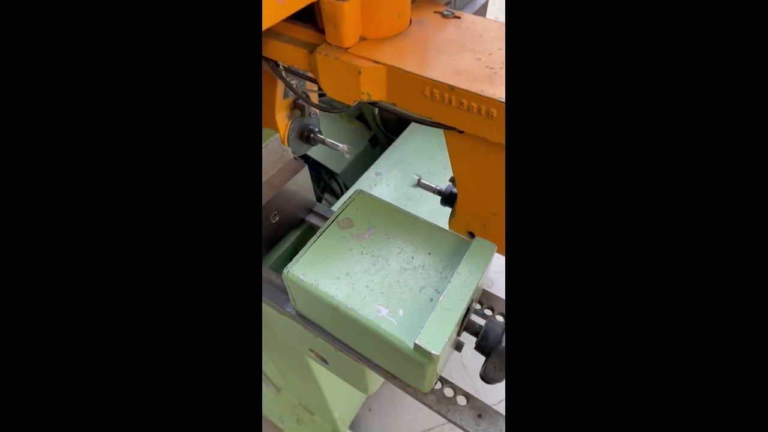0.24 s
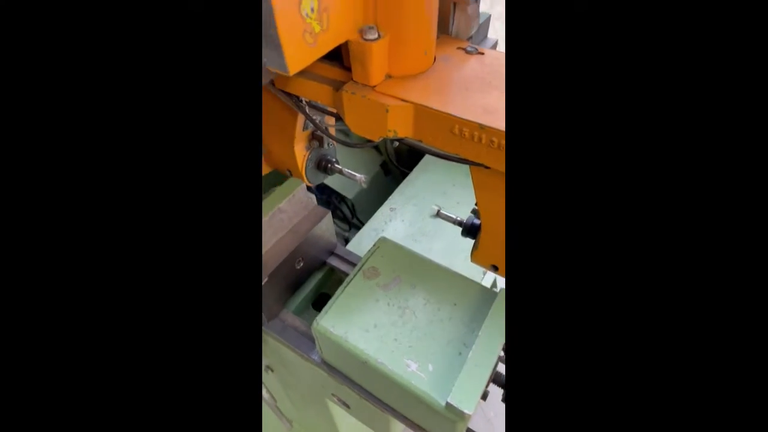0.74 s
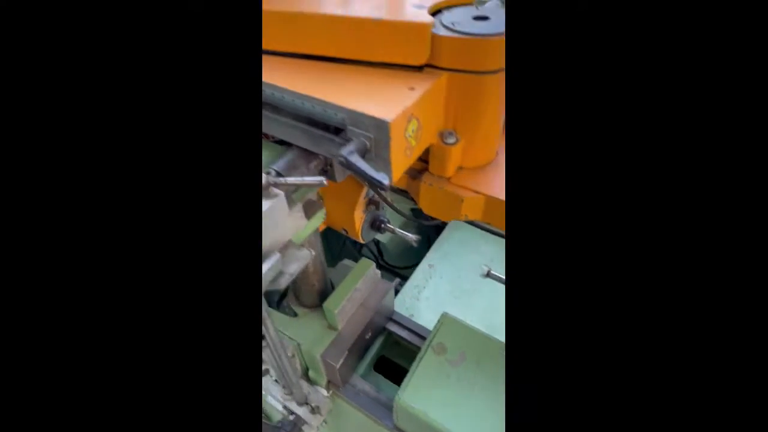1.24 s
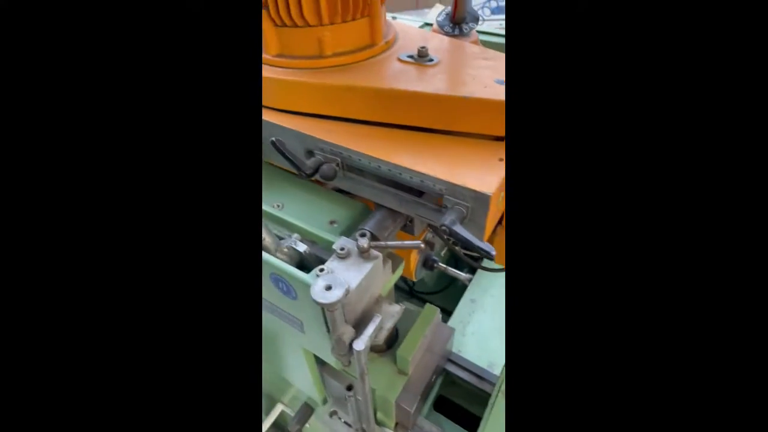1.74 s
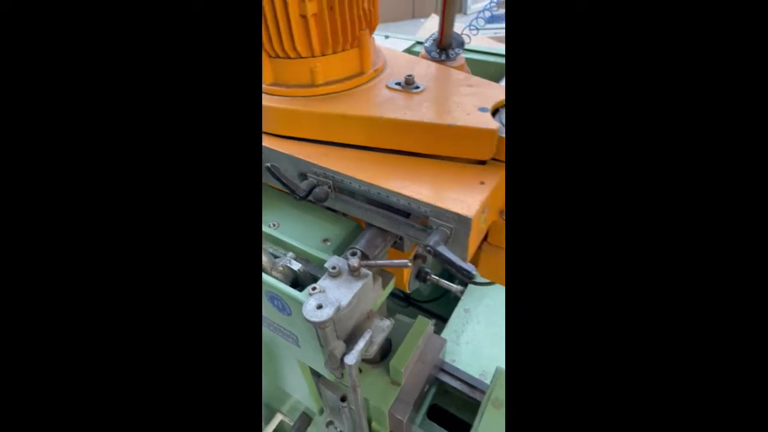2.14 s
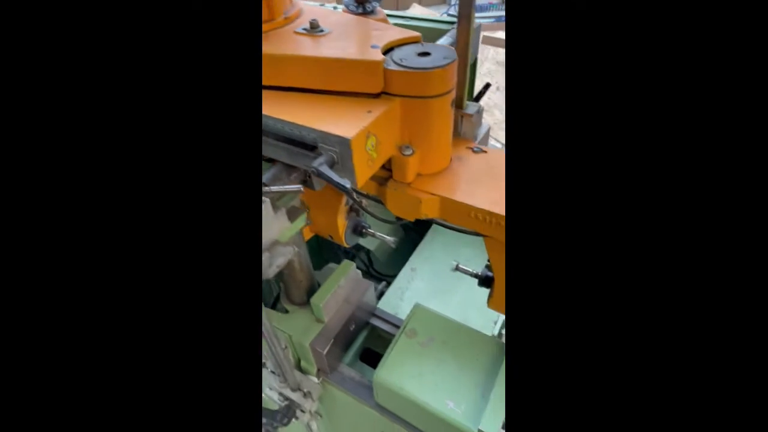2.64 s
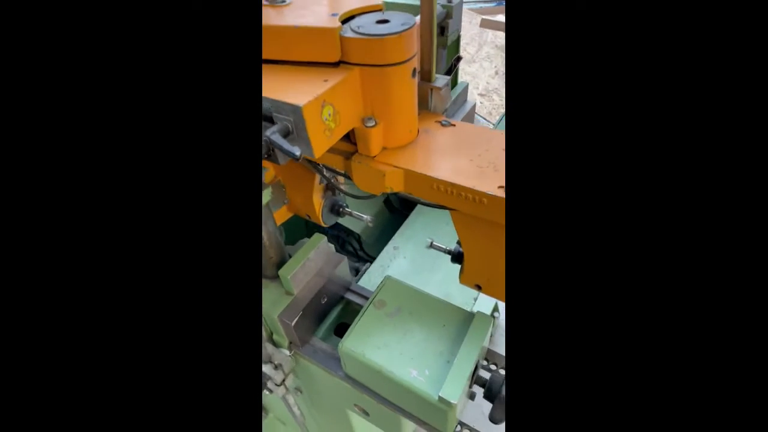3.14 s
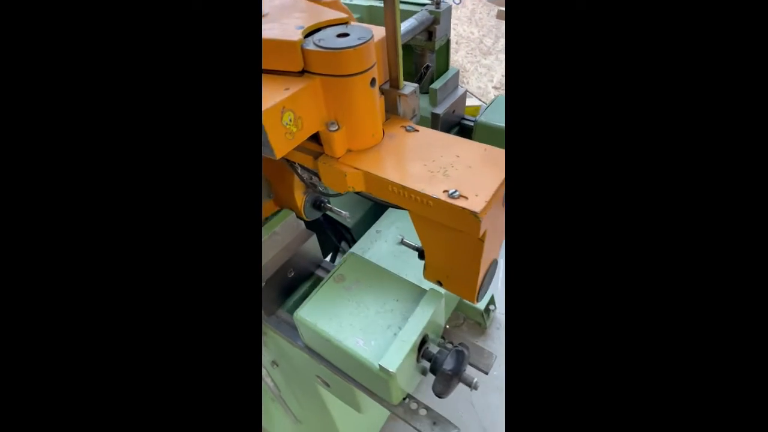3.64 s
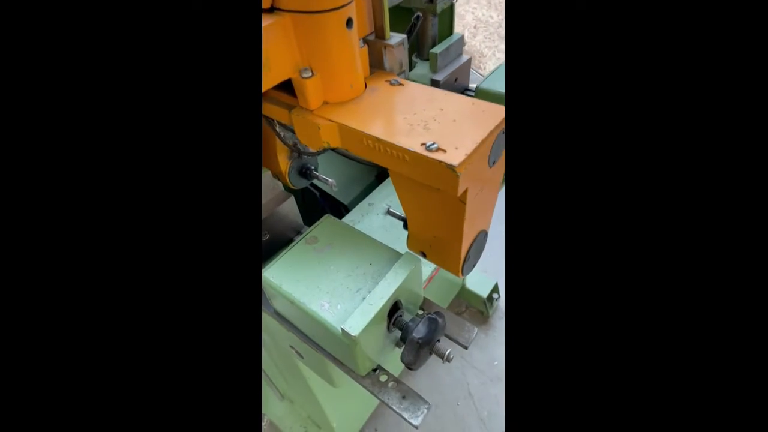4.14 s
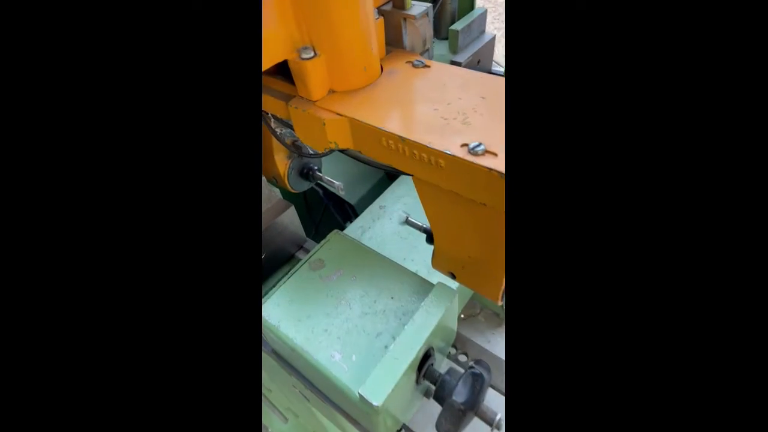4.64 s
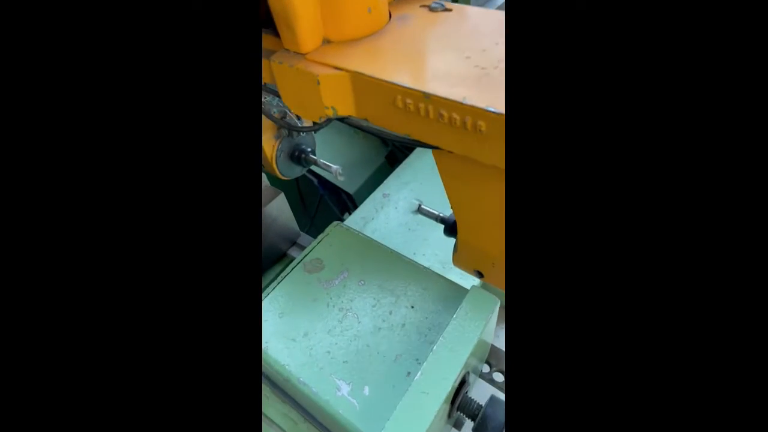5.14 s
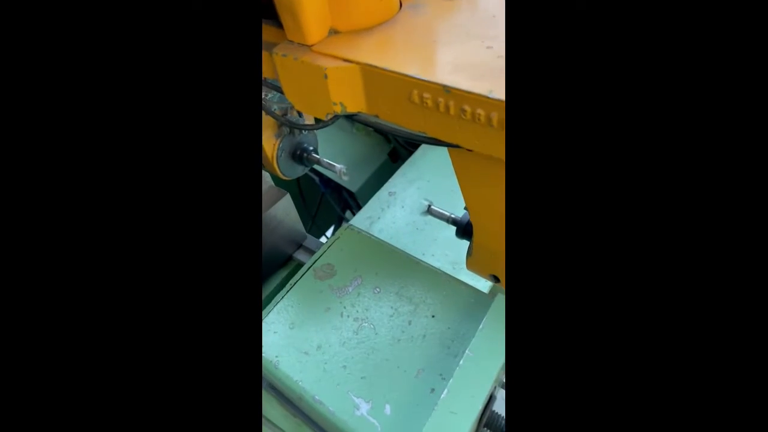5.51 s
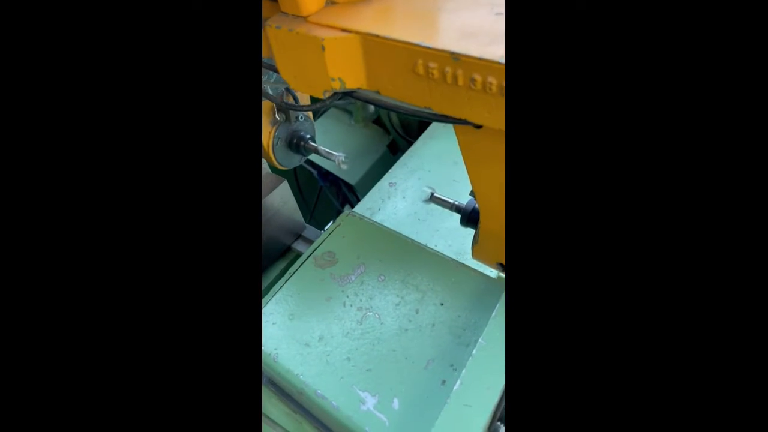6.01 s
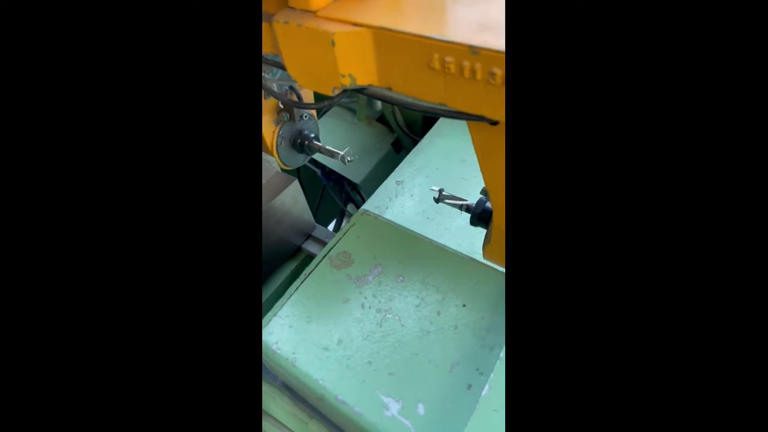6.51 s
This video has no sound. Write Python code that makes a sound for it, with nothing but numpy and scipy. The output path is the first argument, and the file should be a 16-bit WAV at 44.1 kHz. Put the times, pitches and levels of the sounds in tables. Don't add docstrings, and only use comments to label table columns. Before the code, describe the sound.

Steady high motor whine with bearing hiss in a workshop, then switch-off, a fast falling howl with rattling castings, and a buzzing electronic residue.

```python
import sys
import numpy as np
from scipy import signal
from scipy.fft import rfft, irfft
from scipy.io import wavfile

SR = 44100
rng = np.random.default_rng(int(sys.argv[2]) if len(sys.argv) > 2 else 0)


def inscribe(sig):
    pcm = np.round(np.clip(np.atleast_2d(sig).T, -1, 1) * 32767)
    wavfile.write(sys.argv[1], SR, pcm.astype(np.int16))


def ratio_of_db(decibels):
    return 10 ** (np.asarray(decibels, float) / 20)


N = 298557
TIME = np.arange(N) / SR
HZ = np.maximum(np.arange(N // 2 + 1) * SR / N, 1)

SHAFT_HZ, BRAKE_S, BRAKE_HZ_PER_S, EASING_HZ_PER_S2 = 160.2, 5.318, 153, 19.5
# [t/s, level/dB]
WHINE = [(0.0, -28), (0.47, -27.5), (0.84, -35.5), (1.03, -31.5), (1.24, -41.5), (1.4, -32.5),
         (1.52, -26.5), (1.77, -34.5), (2.05, -34.5), (2.15, -32), (2.4, -33), (2.45, -43.5), (2.68, -31.5),
         (2.96, -29), (3.17, -29.5), (3.4, -35.5), (3.65, -32.5), (3.77, -34), (3.86, -43), (3.92, -33.5),
         (4.47, -58), (4.57, -38), (5.31, -24.5)]
SHAFT_TONE = [(0.0, -39), (0.09, -44), (0.41, -37.5), (1.74, -37), (1.82, -42), (3.19, -35), (3.73, -38),
              (3.8, -48), (3.95, -39.5), (4.92, -39.5), (5.25, -47), (5.4, -46), (5.75, -48), (5.95, -38),
              (6.1, -46), (6.3, -54)]
LOWER_SIDE = -50, [(.15, -41, .3), (.58, -39, .15), (1.1, -44, .2), (1.75, -39, .2), (2.15, -40, .2),
              (2.8, -42, .3), (3.65, -45, .12), (4.2, -46, .1), (4.8, -41, .2), (5.2, -39, .2)]
UPPER_SIDE = -58, [(1.1, -39, .12), (2.55, -44, .2), (3.1, -47, .25), (4.25, -42, .25), (4.75, -45, .15),
              (5.25, -41, .2)]
SECOND_SIDE = -63, [(.3, -45, .2), (.85, -39, 0.23), (1.3, -39.5, 0.38), (2.15, -43, 0.24),
               (2.72, -42, 0.33), (3.4, -44.5, 0.35), (4.7, -47, 0.22), (5.2, -38, 0.23)]
LOWER_FALLING = -14, [(5.53, -4, .06)]
TWICE_SLOT = -40, [(1.05, -44, .3), (2.2, -45, .2), (3.5, -45, 0.39), (4.8, -41, 0.5)]
THRICE_SLOT = -50, [(.35, -45, 0.6), (.95, -44, 0.21), (2.15, -46, 0.36), (2.95, -44, .2), (3.9, -60, 0.15),
               (5.2, -50, 0.11)]
ORDER_18 = -67, [(.4, -44.5, 0.56), (2.5, -51, 0.24), (4.2, -45, 0.97)]
ORDER_21 = -56, [(.25, -50, .4), (1.55, -46, 0.28), (2.3, -46, .25), (2.9, -52, .3), (3.7, -51, 0.14),
            (4.5, -51, .15), (5.2, -44, .25)]
ORDER_22 = -55.5, [(.3, -42, .7), (2.0, -62, .5), (4.15, -48, 0.31), (5.1, -46, 0.52)]
ORDER_27 = -63, [(1.1, -48, 0.42), (2.5, -49, .3), (3.3, -45, .2), (4.0, -51, .2), (4.8, -47, 0.22),
            (5.2, -50, .2)]
BELT_SWELLS = [
    (-51.5, [(.57, -47, 0.36), (3.0, -50, 1), (5.2, -55, 0.64)]),
    (-53, [(.3, -47, 0.38), (2.2, -49.5, 0.75), (4.2, -49, 0.84), (5.3, -44.5, 0.66)]),
    (-55.5, [(1.6, -52.5, 0.68), (3.7, -53, 0.46)]),
    (-75, [(.6, -53.5, 1), (3.2, -53, 0.68), (4.8, -46, 1)]),
]
PUMP_SWELL = -64, [(1.9, -54, 0.97)]
TWICE_ORDERS = [47, 48, 49, 50, 51, 45, 46]
TWICE_DB = [-5, -3, -8, -13, -27, -17, -13]
THRICE_ORDERS = [72, 73, 71, 70, 69, 74, 75]
THRICE_DB = [-2, -2, -8, -10, -15, -10, -15]
WEAK_ORDERS = [11, 16, 17.9, 18.89, 19, 20, 22.79, 23.7, 24.3, 28, 28.09, 29.1, 30.11, 31.66, 33]
WEAK_DB = [-58, -58.5, -52.5, -65, -57, -51, -55, -52, -54, -61, -56, -54, -57, -60, -56]
BELT_ORDERS = [1.2, 1.8, 3.6, 6, 1.7, 2, 3, 4.5, 5, 5.11]
BELT_FAINT_DB = [-55.5, -59, -58, -55.5, -57.5, -59.5]
FALLING_DB = [-28, -29, -36, -41.5]
GROUPS_FALLING_DB = [-34, -40]
FALLING_POWER, SHAFT_POWER, GROUP_POWER, BELT_LAP_POWER = 0.93, 1.8, 2.2, .35
# [f/Hz, width/Hz, level/dB]
HOUSING = [(937, 77, 5), (1330, 58, -11), (1760, 90, -1.5), (1980, 68, -2), (2200, 180, -2),
           (2566, 70, 2.5), (2755, 78, 5.5), (2980, 120, 4), (3130, 130, 1.5), (3310, 120, -1),
           (3670, 140, 5.5), (3880, 98, 6), (5470, 930, 0), (6170, 620, 2), (9000, 1400, 5)]
BETWEEN_PEAKS_DB, HANDOVER_S = -15, 0.034
SKIRT_DB, SKIRT_HZ, SKIRT_LOST = -29, 150, .6
LAP_ORDERS = [1.8, 2.1, 2.7, 3.6, 4.5, 5.4, 6]
LAP_DB = [-37.5, -42, -43.5, -54, -54, -51, -58]
FRAME_HZ, FRAME_WIDTH_HZ = 268, 75
# [f/Hz, width/Hz, level/dB]
CASTINGS = [
    (184, 4.7, -4),
    (224, 6.5, -3),
    (264.5, 17, -0.5),
    (935, 30, -4),
    (2106, 91, -2),
]
SHAKE_IDLE_DB, SHAKE_TOP_DB, SHAKE_RISE_S, SHAKE_LOSS_DB_PER_S = -54.5, -39, 0.16, 11.5
# [f/Hz, level/dB]
DRIVE = [(204.3, -54.5), (619, -54), (705.2, -46), (409.5, -55), (829, -48.5), (11800, -52), (11827, -57),
         (3488, -57), (5787, -56), (5850, -57), (12026, -56), (12347, -60), (12762, -54), (12826, -55),
         (14105, -50), (14553, -54), (14649, -56), (14600, -55)]
DRIVE_ON_S, DRIVE_RISE_S = 5.5, 0.019
# [f/Hz, level/dB]
LATE = [(2030, -51), (1846, -62), (1599, -57)]
LATE_S, LATE_RISE_S = 6.42, 0.15
# [steps from the carrier, level/dB]
CARRIER = [(-4, -48), (-3, -47), (-2, -52), (-1, -48), (0, -43), (1, -54), (2, -55)]
CARRIER_HZ, THROB_HZ, CARRIER_DB = 11676, 32, -1.5
# [f/Hz, level/dB per Hz]
FIZZ = [(1500, -24), (2000, -6), (3400, 6), (4300, -38), (5200, -2), (5850, 8), (6600, -6), (8300, 0),
        (8900, -17)]
FIZZ_DB = -45.5
# [t/s, level/dB]
HUM = [(0, -50.5), (4.9, -49), (5.3, -45.5), (5.44, -48), (5.5, -36.5), (5.62, -36.5), (5.68, -43),
       (5.75, -40), (5.82, -41), (5.86, -53), (5.93, -45.5), (6.17, -40), (6.24, -56), (6.5, -51),
       (6.6, -70)]
HUM_HZ, HUM_DB = 240.6, 0
PUMP_HZ, PUMP_DB = 408.8, 3
# [t/s, f/Hz, width/Hz,
# length/s, level/dB]
BURSTS = [(6.01, 3050, 350, .08, -41), (6.3, 11650, 350, .6, -47), (1.8, 1750, 220, .7, -52),
          (5.452, 790, 250, 0.048, -39), (5.42, 50, 25, 0.082, -53), (5.61, 2110, 50, .02, -36),
          (5.655, 2130, 50, .015, -39), (5.69, 2090, 50, .015, -38), (5.74, 2110, 50, .025, -41),
          (6.07, 2800, 150, .03, -43), (5.935, 1950, 50, .03, -44), (5.923, 3680, 80, .04, -42),
          (6.37, 950, 60, 0.023, -44), (6.366, 470, 60, 0.019, -47), (6.462, 248, 70, 0.025, -48),
          (6.25, 55, 25, .15, -58), (6.604, 69.9, 40, .04, -54)]
# [f/Hz, level/dB per Hz]
RUMBLE = [(20, -35), (45, -10), (90, -3), (140, -0.5), (220, -22)]
ROAR = [(120, -10), (200, -0.5), (300, -5.5), (400, 1.5), (600, 1.5), (740, 9.5), (860, 0.5), (1100, 4.5),
        (1350, -1), (1750, 3.5), (2000, 1), (2400, -3), (3000, -18)]
WHIRR = [(2000, -12), (2500, -5.5), (2950, 1.5), (3300, 2), (3750, 4), (4300, 2.5), (4700, -2.5),
         (5100, -3)]
HISS = [(4200, -12), (4800, 5.5), (5600, 4.5), (6500, 2.5), (7200, -7), (8000, 8), (8800, -14)]
AIR = [(8000, -2), (8800, 3.5), (9500, 1.5), (10600, 2), (11600, 5.5), (12300, 1.5), (13000, 2.5),
       (14300, 3.5), (15700, 6), (16100, -21)]
# [level at speed/dB, share of nearness, loss at standstill/dB]
NOISES = [
    (-48.5, 0.45, 3),
    (-42, 3.1, 7.5),
    (-40, 1.34, 7),
    (-40, 2.03, 2),
]
# [t/s, level/dB]
NEAR = [(0, 1.5), (.3, 1), (1.0, 1.5), (1.45, 1), (1.79, 0.5), (2.04, 0), (2.55, 1), (3.5, 0.5), (4.2, 0),
        (5.3, 2), (5.51, 2.5), (5.7, 1.5), (6.2, -0.5), (6.77, 0.5)]
# [t/s, level/dB, dying time/s]
GRIPS = [
    (0.0, -41, .15),
    (.42, -52, .2),
    (1.0, -54, .25),
    (1.75, -56, .12),
    (3.73, -46, .22),
    (5.38, -53, .4),
    (4.55, -54, .4),
    (5.9, -58, .3),
    (6.58, -54, .06),
]
GRIP_QUIET_DB, GRIP_RISE_S = -62.5, 0.019
OFF_S, SAG_DB, SAG_S, TOP_LOST_DB, TOP_HZ = 5.375, -3, .25, -5, 14300
SHOP_T60_S, SHOP_DB = .3, -13
# [f/Hz, lag/rad]
LIKENESS = [(100, .999), (300, 0.99), (800, 0.87), (1300, 0.84), (1900, 0.93), (2600, 0.76), (3600, 0.06),
            (4500, 0.028), (5500, 0.57), (9000, 1), (16000, 0.82)]
LAG = [(50, 0), (500, -.4), (1400, -.1), (2000, .1), (2900, 1.1), (3700, .4), (4900, -.5), (5350, .3),
       (7600, np.pi), (11000, 2 * np.pi), (14250, 3 * np.pi), (16000, 11)]
# [low f/Hz, high f/Hz]
SUM_NULLS = [(6950, 8300), (13850, 14700)]
DIFFERENCE_NULL = (10400, 11450)
CUTOFF_HZ = 16050


def spindle():
    share = speed()
    turn = 2 * np.pi * np.cumsum(share * SHAFT_HZ) / SR
    grid = np.arange(0, 12500, 5)
    housing = ratio_of_db(BETWEEN_PEAKS_DB)
    for hz, width, db in HOUSING:
        housing = housing + ratio_of_db(db) / (1 + (2 * (grid - hz) / width) ** 4)
    braked = np.clip((TIME - BRAKE_S) / HANDOVER_S, 0, 1)
    start = int(BRAKE_S * SR)

    def level(k, steady, falling_db, power):
        gain = (1 - braked) * steady
        slowing = share[start:]
        lit = np.interp(k * SHAFT_HZ * slowing, grid, housing)
        gain[start:] += braked[start:] * ratio_of_db(falling_db) * slowing ** power * lit
        return gain

    def order(k, gain, fade_db, unlike=1.5):
        return line(k * turn, k * SHAFT_HZ, gain, fade_db, unlike)

    whine_db, shaft_db = in_time(WHINE) + in_time(SHAFT_TONE)
    steady = swells(*LOWER_SIDE), ratio_of_db(whine_db), swells(*UPPER_SIDE), swells(*SECOND_SIDE)
    slots = (23, 24, 25, 26)
    gains = [level(k, gain, db, FALLING_POWER) for k, gain, db in zip(slots, steady, FALLING_DB)]
    gains[0] *= 1 - braked + braked * swells(*LOWER_FALLING)
    out = order(1, ratio_of_db(shaft_db) * share ** SHAFT_POWER, 0, unlike=.8)
    out += sum(order(k, gain, 0, unlike=.8) for k, gain in zip(slots, gains))
    out += skirt(turn, gains[1] * (1 - SKIRT_LOST * braked))

    groups = (TWICE_ORDERS, TWICE_DB, TWICE_SLOT), (THRICE_ORDERS, THRICE_DB, THRICE_SLOT)
    for (orders, steps, swell), falling_db in zip(groups, GROUPS_FALLING_DB):
        gain = swells(*swell)
        for k, db in zip(orders, steps):
            out += order(k, level(k, gain, falling_db, GROUP_POWER) * ratio_of_db(db), 3.5)

    force = share ** 2
    out += sum(order(k, force * ratio_of_db(db), 2.5) for k, db in zip(WEAK_ORDERS, WEAK_DB))
    for k, swell in ((18, ORDER_18), (21, ORDER_21), (22, ORDER_22), (27, ORDER_27)):
        out += order(k, force * swells(*swell), 1.2)

    belts = [swells(*belt) for belt in BELT_SWELLS] + list(ratio_of_db(np.array(BELT_FAINT_DB)))
    belts[0] *= force ** (BELT_LAP_POWER - 4) * (share > .36)
    out += sum(order(k, force ** 4.0 * gain, .7) for k, gain in zip(BELT_ORDERS, belts))
    return out, turn


def speed():
    after = np.maximum(TIME - BRAKE_S, 0)
    lost_hz = BRAKE_HZ_PER_S * after - EASING_HZ_PER_S2 * after ** 2
    return np.maximum(1 - lost_hz / SHAFT_HZ, .005)


def skirt(turn, gain):
    play = signal.lfilter(*signal.butter(1, SKIRT_HZ, fs=SR), rng.standard_normal((2, N)))
    play = play[0] + 0.81 * play[1] * [[1], [-1]]
    return gain * ratio_of_db(SKIRT_DB) * play / play.std() * np.sin(24 * turn)


def castings(turn):
    knocks = np.diff(np.floor(turn / (2 * np.pi)), prepend=0) * ratio_of_db(1.5 * rng.standard_normal(N))
    knocks += 1.2 * np.diff(np.floor(0.27 * turn / (2 * np.pi)), prepend=0)
    knocks = (knocks * 5 + .4 * rng.standard_normal(N)) * shake()
    out = np.zeros(N)
    for hz, width, db in CASTINGS:
        r = np.exp(-np.pi * width / SR)
        ring = signal.lfilter([1, 0, -1], [1, -2 * r * np.cos(2 * np.pi * hz / SR), r * r], knocks)
        out += ratio_of_db(db) * np.sqrt(1 - r * r) * ring
    return out


def shake():
    after = TIME - BRAKE_S
    loss_db = SHAKE_LOSS_DB_PER_S * np.maximum(after - SHAKE_RISE_S, 0)
    braked = np.clip(after / SHAKE_RISE_S, 0, 1) ** 2 * ratio_of_db(SHAKE_TOP_DB - loss_db)
    return braked + ratio_of_db(SHAKE_IDLE_DB) * (after < SHAKE_RISE_S)


def frame(turn):
    hz = speed() * SHAFT_HZ
    out = np.zeros(N)
    for k, db in zip(LAP_ORDERS, LAP_DB):
        resonance = 1 / (1 + (2 * (k * hz - FRAME_HZ) / FRAME_WIDTH_HZ) ** 4)
        out += ratio_of_db(db + 3) * np.sin(k * turn) * resonance
    return np.clip((TIME - BRAKE_S) / SHAKE_RISE_S, 0, 1) * out


def bursts():
    out = np.zeros(N)
    for s, hz, width, length, db in BURSTS:
        burst = rng.standard_normal(N) * np.exp(-((TIME - s) / length) ** 2)
        band = [max(hz - width / 2, 10), hz + width / 2]
        sos = signal.butter(1, band, "band", fs=SR, output="sos")
        out += ratio_of_db(db) * np.sqrt(SR / 2 / width) * signal.sosfilt(sos, burst + 1e-18)
    return out


def drive():
    on = np.clip((TIME - DRIVE_ON_S) / DRIVE_RISE_S, 0, 1)
    out = line(2 * np.pi * PUMP_HZ * TIME, PUMP_HZ, swells(*PUMP_SWELL) * ratio_of_db(PUMP_DB), 1.0)
    out += line(2 * np.pi * HUM_HZ * TIME, HUM_HZ, ratio_of_db(in_time(HUM)[0] + HUM_DB), 0.3)
    out += on * ratio_of_db(FIZZ_DB) * port_noise(FIZZ, 5000, 7200)
    start = int(DRIVE_ON_S * SR)
    time = TIME[start:]
    late = np.clip((time - LATE_S) / LATE_RISE_S, 0, 1)
    for lines, gain in ((DRIVE, on[start:]), (LATE, late)):
        for hz, db in lines:
            out[:, start:] += line(2 * np.pi * hz * time, hz, gain * ratio_of_db(db), 1.1, unlike=.8)
    for k, db in CARRIER:
        sideband = np.sin(2 * np.pi * (CARRIER_HZ + k * THROB_HZ) * TIME + k * np.pi)
        out += on * np.sqrt(2) * ratio_of_db(db + CARRIER_DB) * sideband
    return out


def noises(turn):
    near_db, slowed = in_time(NEAR)[0], 1 - speed()
    roar, whirr, hiss, air = (ratio_of_db(db + follows * near_db - lost_db * slowed) for db, follows, lost_db in NOISES)
    off = np.clip((TIME - OFF_S) / GRIP_RISE_S, 0, 1)
    sag = ratio_of_db(SAG_DB * off * np.exp(-np.maximum(TIME - OFF_S, 0) / SAG_S))
    grip = ratio_of_db(GRIP_QUIET_DB)
    for s, db, dying in GRIPS:
        rise = np.clip((TIME - s) / GRIP_RISE_S + (s == 0), 0, 1)
        grip = grip + ratio_of_db(db) * rise * np.exp(-np.abs(TIME - s) / dying)
    throb = 1 + 0.054 * np.sin(turn) + 0.053 * np.sin(turn / 5) + 0.029 * np.sin(turn * 2 / 5)
    out = grip * ratio_of_db(1.5 * drift(12)) * port_noise(RUMBLE, 30, 157)
    out += roar * sag * port_noise(ROAR, 965, 1563)
    out += whirr * throb * port_noise(WHIRR, 1880, 3600)
    out += hiss * throb * port_noise(HISS, 4740, 6650)
    bright = port_noise(AIR, 8870, 11000)
    top = signal.sosfiltfilt(signal.butter(6, TOP_HZ, "high", fs=SR, output="sos"), bright)
    bright = bright + (ratio_of_db(TOP_LOST_DB * off) - 1) * top
    return out + air * sag * ratio_of_db(0.54 * drift(12)) * throb * bright


def shop(tones):
    tail = rng.standard_normal(SR) * ratio_of_db(-60 * np.arange(SR) / SR / SHOP_T60_S)
    tail = signal.lfilter([1, -1], [1, -.9], tail)
    tail *= ratio_of_db(SHOP_DB) / np.sqrt(np.sum(tail ** 2))
    sweep = tones * (TIME > DRIVE_ON_S - .2)
    return tones + signal.fftconvolve(sweep, tail[None], axes=1)[:, :N]


def line(phase, hz, gain, fade_db, unlike=1.5):
    coarse, n = TIME[::16], len(phase)
    apart = unlike * np.sqrt(1 - np.clip(at_hz(LIKENESS, hz), 0, 1) ** 2) * drift(2.5, coarse)
    wander = rng.uniform(0, 2 * np.pi) + 0.57 * drift(6, coarse) + apart * [[.5], [-.5]]
    fade = np.sqrt(2) * ratio_of_db(fade_db * drift(3.54, coarse))
    wander = np.repeat(wander, 16, axis=1)[:, :n]
    phase = ((phase % (2 * np.pi)) + wander).astype(np.float32)
    return gain * np.repeat(fade, 16)[:n] * np.sin(phase)


def swells(between_db, rows):
    coarse = TIME[::256]
    bells = sum(ratio_of_db(db) * np.exp(-((coarse - s) / width) ** 2) for s, db, width in rows)
    return np.interp(TIME, coarse, ratio_of_db(between_db) + bells)


def port_noise(spectrum, ref_lo, ref_hi):
    shape = ratio_of_db(at_hz(spectrum, HZ)) * (HZ > spectrum[0][0]) * (HZ < spectrum[-1][0])
    shared, own = rfft(rng.standard_normal((2, N)))
    alike = np.clip(at_hz(LIKENESS, HZ), 0, 1)
    pair = shape * np.array([shared, alike * shared + np.sqrt(1 - alike ** 2) * own])
    power = 2 * np.sum(shape[(HZ > ref_lo) & (HZ < ref_hi)] ** 2) / N
    return irfft(pair, N) / np.sqrt(power)


def drift(rate, time=TIME):
    knots = rng.standard_normal(200)
    return np.interp(time * rate, np.arange(200), knots) * 1.2


def in_time(rows):
    s, *columns = np.transpose(rows)
    return [np.interp(TIME, s, c) for c in columns]


def at_hz(points, hz):
    f, value = np.transpose(points)
    return np.interp(np.log(hz), np.log(f), value)


def scene():
    tones, turn = spindle()
    return shop(tones) + castings(turn) + frame(turn) + bursts() + drive() + noises(turn)


def roll_off(x):
    return signal.sosfilt(signal.butter(12, 17170, fs=SR, output="sos"), x)


def record(dry):
    lag = np.interp(HZ, *np.transpose(LAG))
    left, right = rfft(dry) * np.exp(-1j * lag * [[0], [1]]) * (HZ < CUTOFF_HZ)
    # [f/Hz, level/dB]
    response = [(250, -.5), (420, -1.2), (650, 1.2), (3500, 1.2), (5000, 0)]
    right = right * ratio_of_db(at_hz(response, HZ))
    mid, side = (left + right) / 2, (left - right) / 2
    for low, high in SUM_NULLS:
        mid = mid * ((HZ < low) | (HZ > high))
    low, high = DIFFERENCE_NULL
    side = side * ((HZ < low) | (HZ > high))
    return roll_off(irfft(np.array([mid + side, mid - side]), N))


dry = scene()
out = record(dry)
inscribe(out)
```